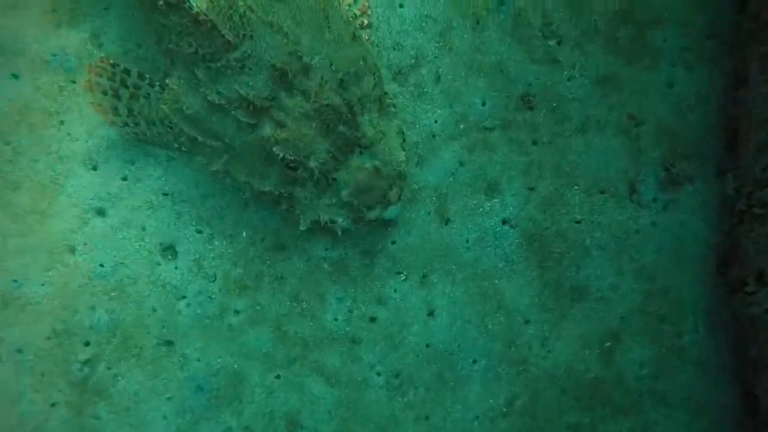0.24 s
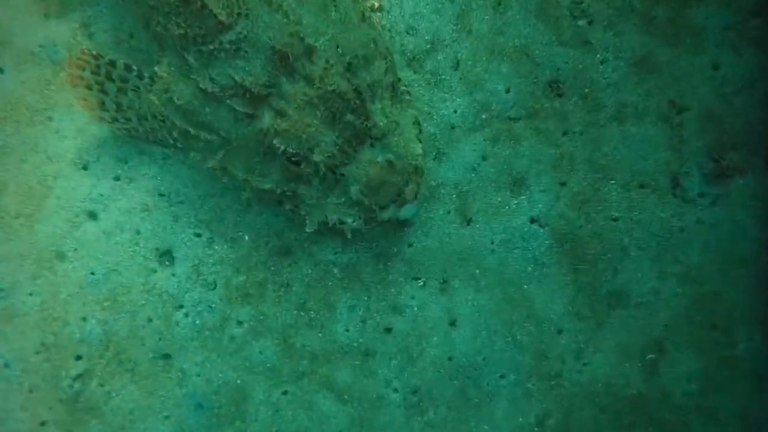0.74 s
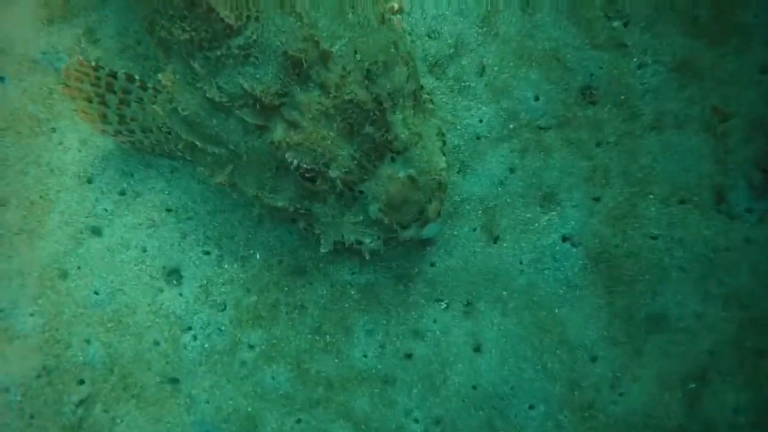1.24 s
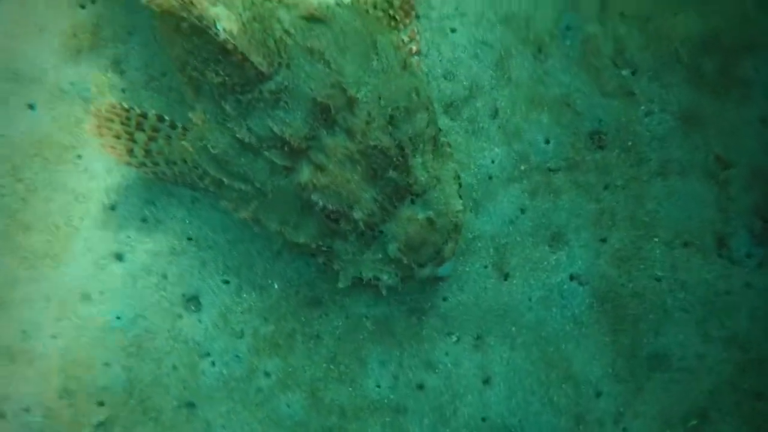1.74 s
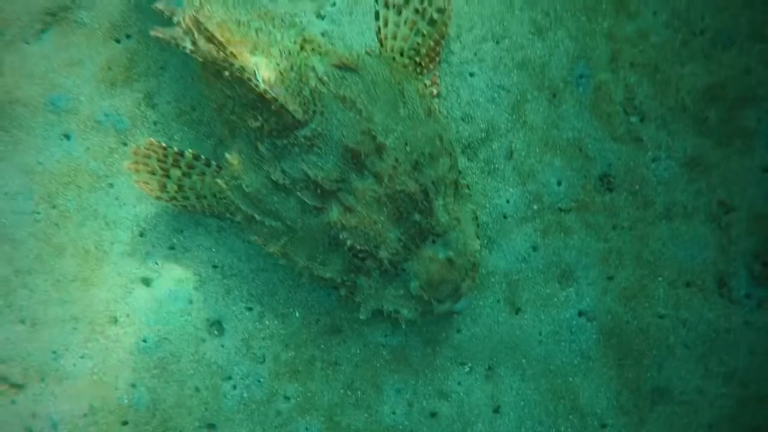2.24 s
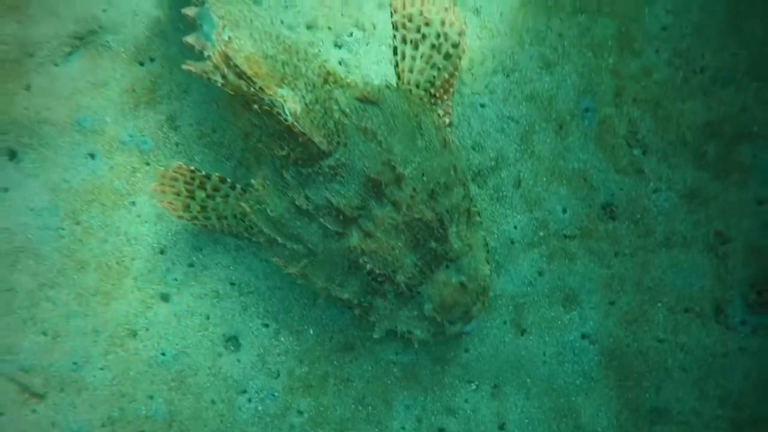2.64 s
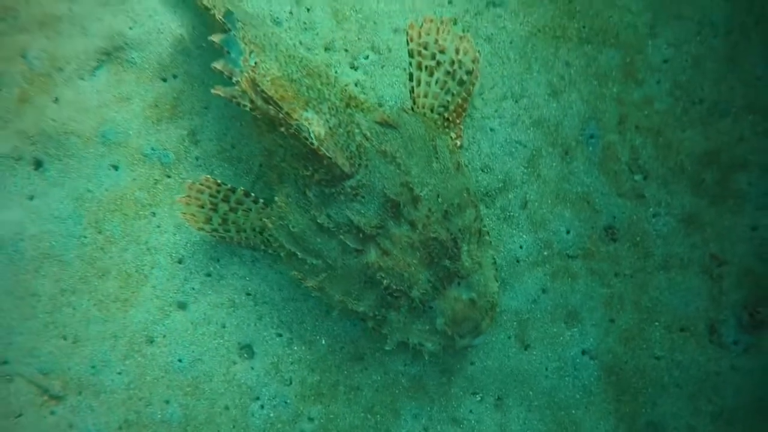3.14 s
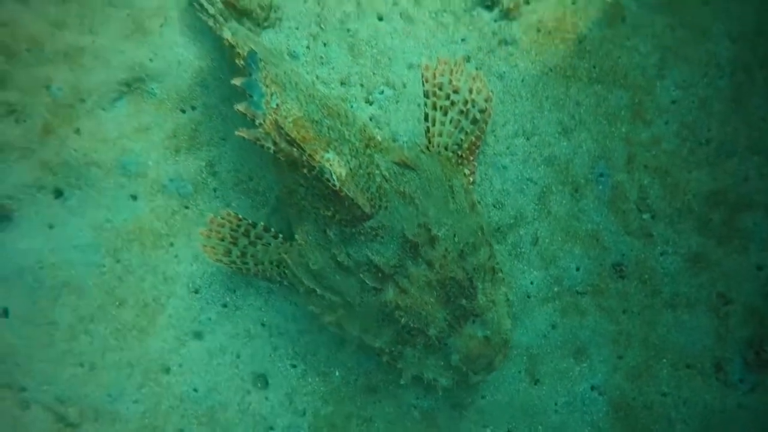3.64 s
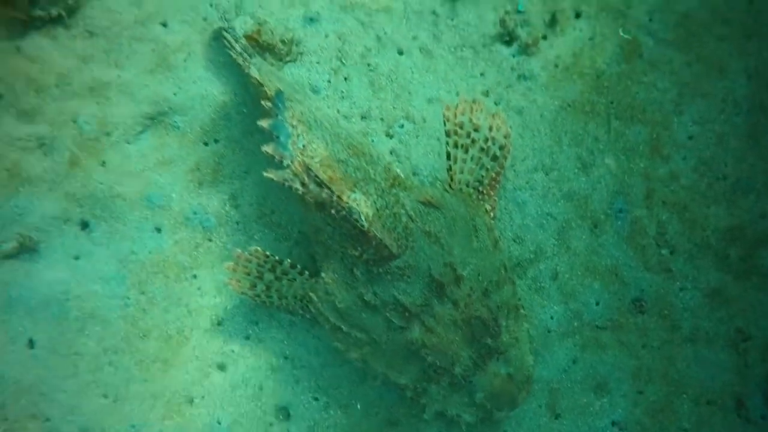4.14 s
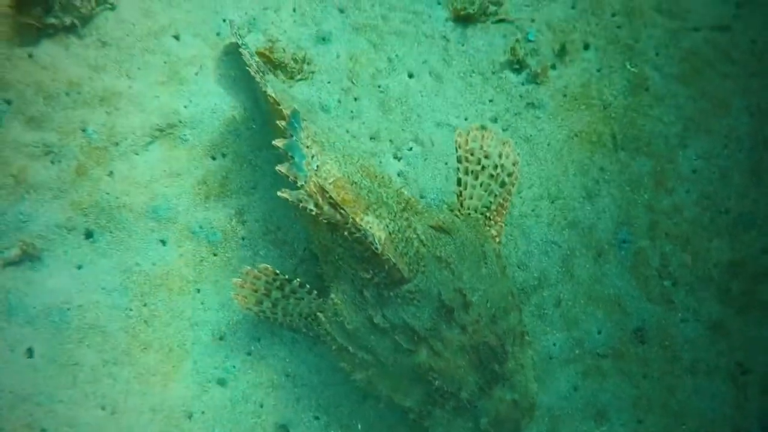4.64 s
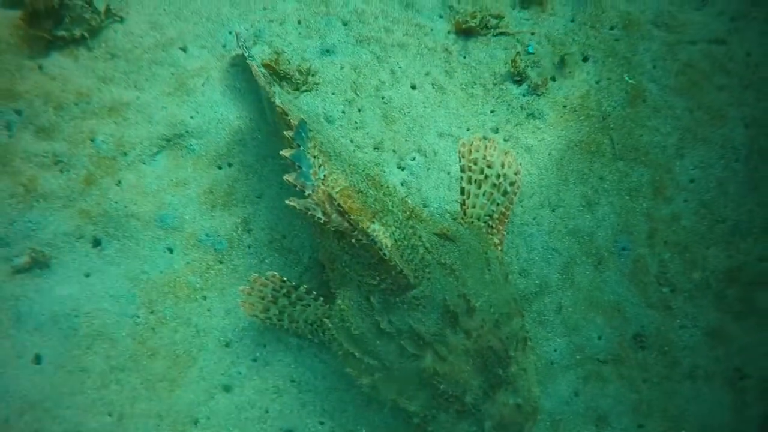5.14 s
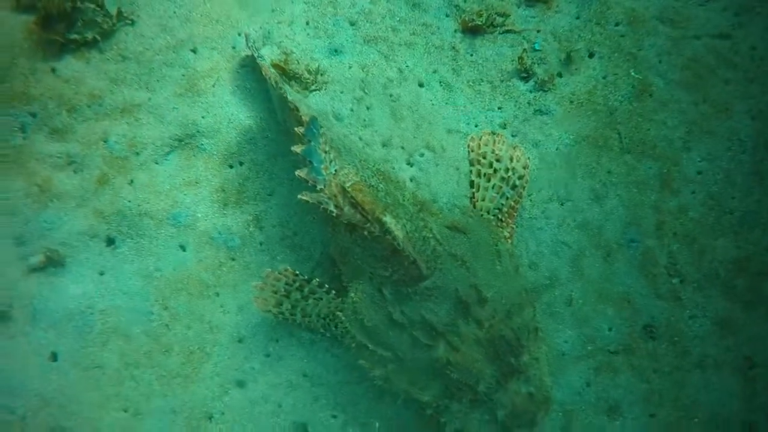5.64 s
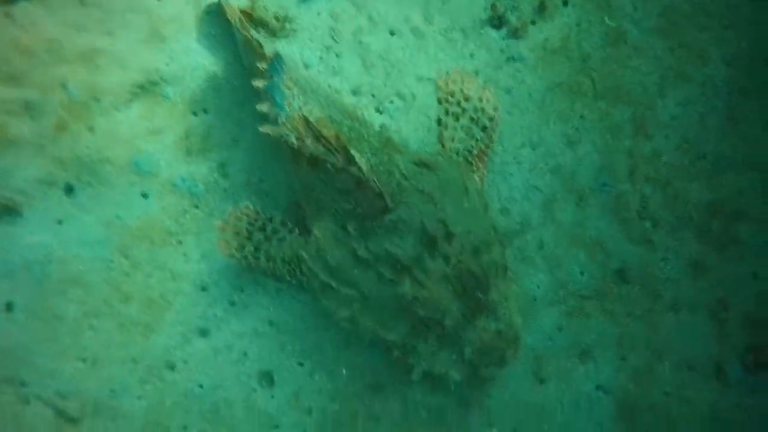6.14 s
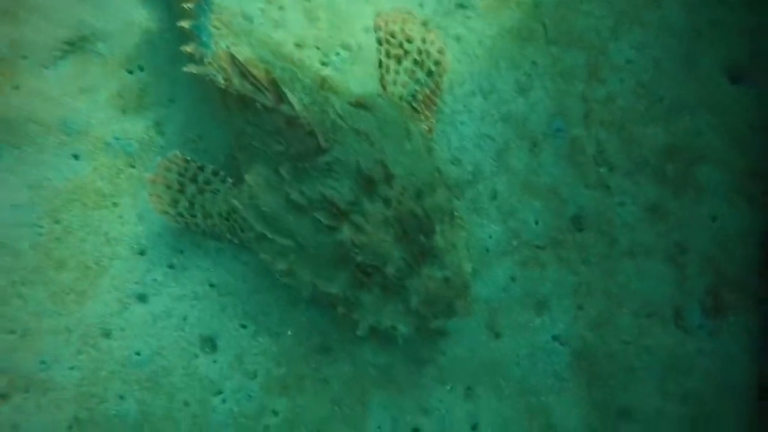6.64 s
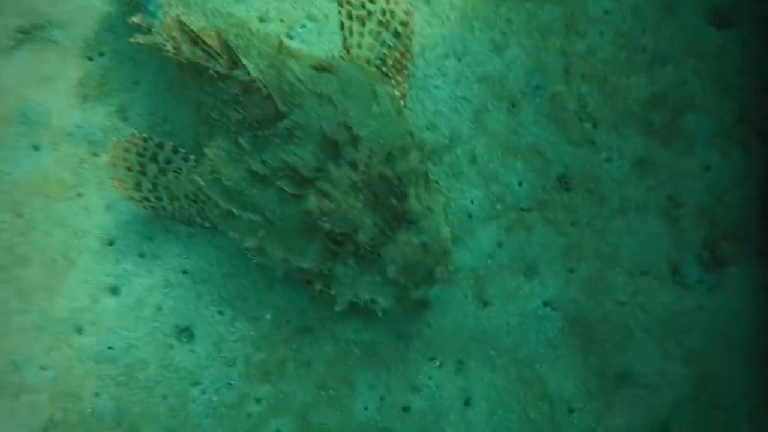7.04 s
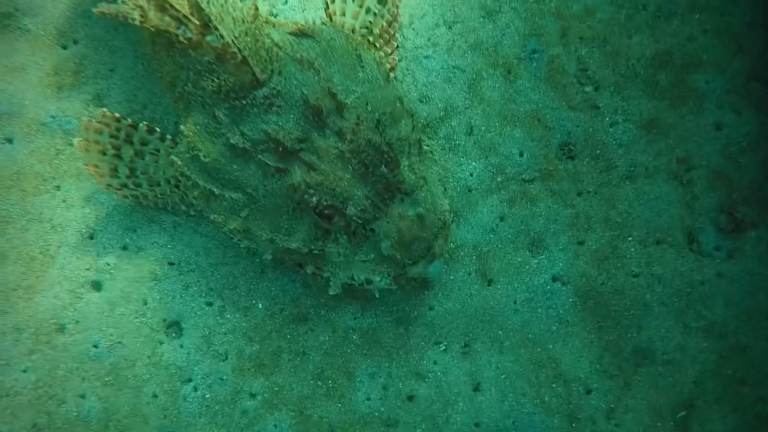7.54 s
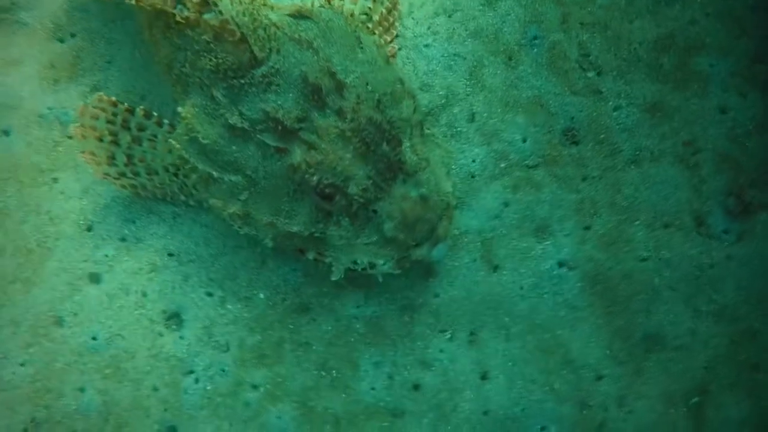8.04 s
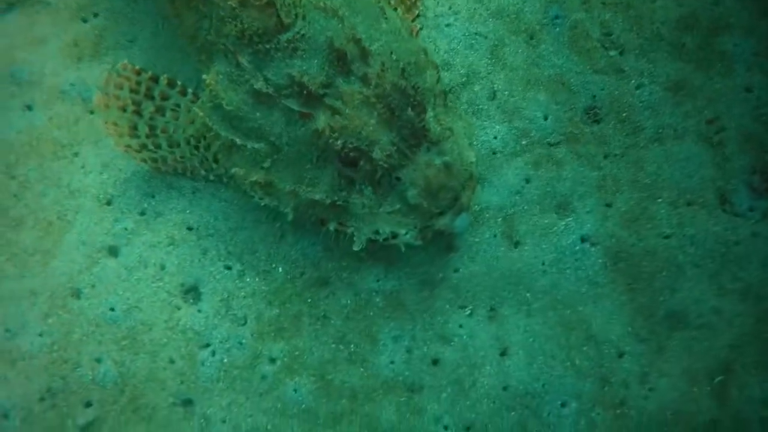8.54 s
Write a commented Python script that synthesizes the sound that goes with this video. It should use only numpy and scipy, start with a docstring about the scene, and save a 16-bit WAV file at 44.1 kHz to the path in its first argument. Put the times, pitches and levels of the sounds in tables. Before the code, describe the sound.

Snapping shrimp crackle densely underwater, sharp hollow clicks near and far over low water rumble and soft knocks on the camera housing.

```python
"""A shallow sandy reef, heard from a camera in a watertight housing that hovers above it.
Snapping shrimp crackle near and far; each near snap comes direct, off the surface and scattered by the seabed,
and rings the resonances of the housing. Now and then a bump knocks its low resonances.
Moving water sways the housing, rumbles along it and makes the air inside drone, over a soft hiss and
a thin whistle."""
import sys
import numpy as np
from scipy import signal
from scipy.fft import rfft, irfft, next_fast_len
from scipy.io import wavfile
from scipy.ndimage import map_coordinates

SR = 44100
rng = np.random.default_rng(int(sys.argv[2]) if len(sys.argv) > 2 else 0)


def int16_out(signal):
    """Quantize to a 16-bit WAV file."""
    q = np.round(np.clip(np.atleast_2d(signal).T, -1, 1) * 32767)
    wavfile.write(sys.argv[1], SR, q.astype(np.int16))


N = 386757
TIME = np.arange(N) / SR
SNAP_TIME = np.arange(4096) / SR
RING_TIME = np.arange(1536) / SR
SIDES = np.array([[.5], [-.5]])  # left, right: each takes half of a difference between them

# resonances of the housing:
# [f/Hz, width/Hz, relative level/dB, left minus right/dB, left lead/rad]
HOUSING = [(340, 71, -4.5, 10.5, -2.5), (516, 240, -21, -3, 1.5), (655, 55, -9.5, 1.5, -2),
           (775, 125, -2.5, 2, 3.5), (962, 108, -0.5, -3, -2.5), (1055, 156, 0.5, 2.5, -3),
           (1181, 99, -4, 0, -1.98), (1470, 190, -1.5, -4.5, 1.46), (1596, 140, 3, -1, 1.3),
           (1720, 195, 1.5, -5, 0.02), (1975, 170, 0.5, -8, -1.2), (2310, 320, -1.5, 2, 4),
           (2640, 200, 0, -7.5, 1.33), (3124, 450, 4, -6, 3.5), (3470, 620, -5.5, 1, -4),
           (3780, 300, -1.5, -16, 2), (4270, 280, -8.5, -5.5, 1), (4830, 600, -10, -6.5, 4),
           (6100, 700, -22, -2, 0.2)]
# tops of its low (body) and middle (upper) registers; the crack lies above
BODY_TOP_HZ, UPPER_TOP_HZ = 1280, 1840
FORERUNNER_S = 0.006  # how early the weak forerunner through the seabed starts


def from_db(db):
    """Decibels to gain."""
    return 10 ** (np.asarray(db) / 20)


def rms_one(x):
    """Scale to rms 1."""
    return x / np.sqrt(np.mean(x ** 2) + 1e-20)


def in_time(rows):
    """The level of a [t/s, level/dB] table at every sample."""
    s, level_db = np.transpose(rows)
    return np.interp(TIME, s, level_db)


def add(out, s, sound):
    """Mix a stereo sound in at time s."""
    i = max(round(s * SR), 0)
    out[:, i:i + sound.shape[1]] += sound[:, :max(N - i, 0)]


def drift(rate):
    """Smooth random wandering through about rate random points a second; rms 1."""
    knots = rng.standard_normal(2048)
    return rms_one(map_coordinates(knots, [TIME * rate], order=2, mode="wrap"))


def noise(spectrum, alike, pan_db, lag_s=0):
    """Stereo noise of a given colour and left-right likeness, later on the left by lag_s; rms 1."""
    hz, db = np.transpose(spectrum)
    size = next_fast_len(N)
    f = np.maximum(np.fft.rfftfreq(size, 1 / SR), 1)
    gain = from_db(np.interp(np.log(f), np.log(hz), db, left=-np.inf, right=-np.inf))
    white = rng.standard_normal((2, size))
    mid, side = irfft(rfft(white) * gain, size)[:, :N]
    alike = np.clip(alike, -1, 1)
    both = np.sqrt(1 + alike) * mid + np.sqrt(1 - alike) * side * [[1], [-1]]
    both[0] = np.interp(TIME - lag_s, TIME, both[0])
    return rms_one(both * from_db(SIDES * pan_db))


def ring(t, hz, width, pan_db, lead, phase):
    """A resonance swells and dies; the two microphones sit at different points of its wave."""
    age = t * np.pi * width / np.sqrt(np.sqrt(2) - 1)
    envelope = age * np.exp(1 - age)
    return envelope * from_db(SIDES * pan_db) * np.sin(2 * np.pi * hz * t + phase + SIDES * lead)


def sustained(hz, width, pan_db, lead):
    """One resonance kept ringing by random pressure; rms 1."""
    mode = ring(SNAP_TIME, hz, width, pan_db, lead, 0)
    pressure = rng.standard_normal((1, N))
    return rms_one(signal.oaconvolve(pressure, mode, axes=1)[:, :N])


def struck_housing(modes, path, vary_db, vary_lead, detune):
    """A pulse train rings the wall modes; random direction sets their strengths and phases. Energy 1."""
    rings, gains = [], []
    for hz, width, db, pan_db, lead in modes:
        strength, lean, turn, shift, phase = rng.standard_normal(5)
        rings.append(ring(RING_TIME, hz + detune * width * shift, width, pan_db + vary_db * lean,
                          lead + vary_lead * turn, 2 * np.pi * phase))
        gains.append(from_db(db + vary_db * strength))
    rung = signal.fftconvolve(np.array(rings), path[None, None], axes=2)
    # even out the modes' energies, so that the gains alone set the balance
    sound = np.tensordot(gains / np.linalg.norm(rung, axis=(1, 2)), rung, 1)
    return sound / np.linalg.norm(sound)


def water_path(delay, reflected_db, smear, echo_share, scatter_t60, far_db, far_t60, pulse_share=0):
    """A direct pulse, all or partly smeared, its surface echo, seabed scatter and a faint longer wash."""
    t = SNAP_TIME
    grains = rng.standard_normal((4, len(t))) * rng.exponential(1, (4, len(t))) ** 1.6
    late = np.maximum(t - delay, 0)
    swell = np.minimum(t / abs(delay), 1)
    shapes = [t * np.exp(-t / smear),
              late * np.exp(-late / smear),
              swell * from_db(-60 * t / scatter_t60),
              swell * from_db(-60 * t / far_t60)]
    smeared, echo, scatter, wash = [g / np.linalg.norm(g) for g in grains * shapes]
    share, clean = np.clip([echo_share, pulse_share], 0, 1)
    direct = np.sqrt(clean) * (t == 0) + np.sqrt(1 - clean) * smeared
    # the surface turns its echo upside down
    reflected = np.sqrt(1 - share) * scatter - np.sqrt(share) * echo
    return direct + from_db(reflected_db) * reflected + from_db(far_db) * wash


def with_forerunner(path, db):
    """Put a soft swell, which has come faster through the sand, ahead of the water-borne pulse."""
    swell = np.linspace(0, 1, max(round(FORERUNNER_S * SR), 2)) ** .5
    early = swell * rng.standard_normal(len(path))[:len(swell)]
    return np.concatenate([from_db(db) * early / np.linalg.norm(early), path])


def hiss():
    """A soft steady hiss: coloured noise, almost unrelated left and right."""
    # colour of the hiss: [f/Hz, relative level/dB]
    hiss_colour = [(300, -13), (700, 7.5), (1500, -8.5), (2200, -5), (3500, -3), (4800, -5.5), (6000, -13),
                   (7200, -25), (9000, -50)]
    return from_db(-61.4) * noise(hiss_colour, alike=0.061, pan_db=-3.0)


def whistle():
    """A thin whistle: one narrow resonance held ringing by random pressure."""
    return from_db(-71.5) * sustained(hz=4298, width=40, pan_db=-2.5, lead=-2.8)


def far_snaps(per_s, spread_db, wash_db, low_db, upper_db, crack_db):
    """Countless distant snaps of uneven size merge into a crackle that keeps the housing ringing."""
    # course of the distant colony, before its trim: [t/s, level/dB]
    colony_course = [(0, -57.5), (1.5, -57.5), (2.9, -58.5), (4.2, -59), (5.7, -59), (6.1, -60),
                     (7.9, -56.5), (8.77, -57)]
    sizes = from_db(spread_db * np.minimum(rng.exponential(1, N), 4))
    clicks = rms_one(sizes * (rng.random(N) < per_s / SR))
    crackle = 0
    for hz, width, db, pan_db, lead in HOUSING:
        drive = rng.standard_normal(N) * (np.abs(clicks) + from_db(wash_db))
        mode = ring(RING_TIME, hz, width, pan_db, lead, 0)
        mode = mode / np.linalg.norm(mode)
        lift = [low_db, upper_db, crack_db][np.digitize(hz, [BODY_TOP_HZ, UPPER_TOP_HZ])]
        crackle = crackle + from_db(db + lift) * signal.oaconvolve(drive[None], mode, axes=1)[:, :N]
    return from_db(in_time(colony_course) + 3.5) * rms_one(crackle)


def flow(lumpy_db, lumps_per_s):
    """Water sways the housing, rumbles along it in eddies and makes the air inside drone."""
    # courses of the sway, of the rumble, and of the flutter and drone, before trims: [t/s, level/dB]
    sway_course = [(0, -27), (.3, -35), (.72, -30.5), (1.18, -33), (1.75, -33), (1.9, -35.5), (2.12, -31.5),
                   (2.42, -35.5), (2.8, -34.5), (3.15, -39), (3.32, -31.5), (3.52, -37), (4.2, -40),
                   (4.92, -38), (5.3, -39), (6.85, -35.5), (7.1, -34), (7.38, -36), (7.7, -32), (8.77, -32)]
    rumble_course = [(0, -44), (.35, -49), (2.0, -50), (2.8, -47.5), (3.8, -48.5), (5.45, -47.5),
                     (6.1, -50), (7.2, -51), (7.65, -46), (8.45, -43), (8.77, -52.5)]
    flutter_course = [(0, -55), (1.5, -53), (2.9, -52.5), (4.1, -53), (5.4, -50), (6.1, -52.5),
                      (7.3, -52.5), (8.25, -48.5), (8.77, -44)]
    # their colours: [f/Hz, relative level/dB]
    sway_colour = [(3, -16.5), (6, -4), (10, 0.5), (17, -1), (22, -4.5), (30, -8), (38, -17.5), (50, -15.5),
                   (90, -59.5)]
    rumble_colour = [(25, -19.5), (42, -3.5), (56, -0.5), (70, -2.5), (95, -4), (130, -11.5), (250, -33)]
    flutter_colour = [(70, -18), (130, 0), (180, 4.5), (215, 3), (260, -3.5), (330, -0.5), (420, -15.5),
                      (520, -25.5), (800, -18), (1200, -33.5), (2500, -46.5)]
    flutter_db = in_time(flutter_course)
    # all five layers swell together with the eddies, each to its own degree
    eddies = lumpy_db * drift(lumps_per_s)
    sway_gain = from_db(in_time(sway_course) + 4.2 + 0.7 * eddies)
    sway = sway_gain * noise(sway_colour, alike=0.995, pan_db=-1.5, lag_s=.0011)
    rumble_gain = from_db(in_time(rumble_course) - 0.6 + eddies)
    rumble = rumble_gain * noise(rumble_colour, alike=0.69, pan_db=-3.0)
    flutter = from_db(flutter_db - 1.2 + 1.05 * eddies) * noise(flutter_colour, alike=0.44, pan_db=5.0)
    air_mode = sustained(hz=327, width=55, pan_db=6, lead=-1.9)
    drone = from_db(flutter_db - 4.3 + 1.2 * eddies) * air_mode
    second_mode = sustained(hz=365.0, width=86, pan_db=-1, lead=-2.57)
    second_drone = from_db(flutter_db - 2.8 + .6 * eddies) * second_mode
    return sway + rumble + flutter + drone + second_drone


def bumps(trim_db):
    """Soft knocks ring the low resonances of the housing, most of all those near the contact's pitch."""
    # bumps on the housing, before the trim:
    # [t/s, level/dB, pitch of the contact f/Hz, damping as a multiple of the modes' width]
    knocks = [(.233, -37, 234, 1), (0.481, -32, 241, .9), (0.487, -36, 120, 1), (0.496, -34, 680, 1),
              (0.727, -37, 270, 1.4), (0.789, -34, 328, 1.2), (0.818, -32, 700, 1.2), (1.169, -29.5, 89, 1),
              (1.887, -35.5, 245, .45), (2.195, -34, 150, 1), (2.336, -35.5, 190, 1.2), (2.358, -39, 95, 1),
              (2.625, -22.5, 130, 2.2), (2.768, -29.5, 135, 1.2), (2.781, -35, 322, .9),
              (2.785, -38, 680, 1.2), (2.844, -33.5, 192, 1.2), (2.953, -28, 85.5, .55),
              (3.282, -37, 90, 1), (3.706, -36, 540, 3.5), (3.908, -36, 200, 1), (4.093, -36.5, 55, 1),
              (4.137, -39, 340, 1.3), (4.32, -39, 90, 1), (4.668, -37, 250, 1), (4.778, -36.5, 440, .6),
              (4.886, -31.5, 380, 2.2), (4.892, -32.5, 130, .7), (4.98, -29.5, 90, 1),
              (5.042, -39, 214, .6), (5.127, -39, 195, 1), (5.4, -37.5, 90, 1), (5.482, -38.5, 335, 1),
              (5.73, -36.5, 195, 1), (5.945, -36.5, 94, .9), (6.248, -37, 220, 1), (6.307, -38, 338, 1),
              (6.67, -37, 335, 1), (6.81, -34, 230, 1), (6.983, -32.5, 271, .7), (7.354, -28.5, 90, 1.2),
              (7.653, -37, 95, 1), (7.846, -19, 385, 1.1), (7.902, -33, 260, 1), (8.415, -29, 194, .5),
              (8.419, -29, 95, .9), (8.422, -26, 330, 1), (8.442, -31, 300, 1), (8.523, -25.5, 94.5, 1.6)]
    # low resonances of the housing: [f/Hz, undamped width/Hz, left minus right/dB, left lead/rad]
    low_modes = [(52, 24, -9, 6.5), (88, 26, 0, 0.5), (130, 77, -4, 1), (192, 56, 2.5, 1.3),
                 (333.4, 33.4, 4, -2), (406.5, 47, -1.5, -2.5), (560, 210, 1.5, 2), (665, 70, 5, -1)]
    focus_db = 30  # loss of a mode one octave from the contact's pitch
    out, mode_hz = np.zeros((2, N)), np.array(low_modes)[:, 0]
    for s, db, pitch_hz, damping in knocks:
        weights = from_db(-focus_db * np.log2(mode_hz / pitch_hz) ** 2)
        weights = weights / np.linalg.norm(weights)
        rings = [ring(SNAP_TIME, hz, width * damping, pan_db, lead, rng.uniform(0, 2 * np.pi))
                 for hz, width, pan_db, lead in low_modes]
        add(out, s, from_db(db + trim_db) * np.tensordot(weights, rings, 1))
    return out


def small_snaps(per_s, size_db, spread_db, count=16):
    """Shrimp at middle distance, in count directions, tick in the upper resonances; most are faint."""
    out = np.zeros((2, N))
    upper_modes = np.array(HOUSING)[5:]
    paths = [water_path(rng.uniform(.003, .012), -5, .0003, .5, .05, -18, .1) for _ in range(count)]
    voices = [struck_housing(upper_modes, path, vary_db=4, vary_lead=.9, detune=.4) for path in paths]
    # 1024 possible moments, of which per_s a second come true on average
    for k, (when, area, chance) in enumerate(rng.random((1024, 3))):
        if chance < per_s * TIME[-1] / 1024:
            tick_db = size_db - spread_db * np.sqrt(area)
            add(out, when * TIME[-1], from_db(tick_db) * voices[k % count])
    return out


def snap(modes, body_db, upper_db, crack_db, reflected_db, echo_s, smear_s, smear_per_db, crisp_db,
         closest_db, dry_per_db, scatter_t60, wash_db, wash_t60, treble_loss):
    """One shrimp rings three registers of the housing; levels are as rms over 40 ms."""
    register = np.digitize(modes[:, 0], [BODY_TOP_HZ, UPPER_TOP_HZ])
    span = np.sqrt(2 * .04 * SR)  # energy 1 to rms 1 over 40 ms of two channels
    # a dull snap has come a longer way: its arrival is more spread out, its forerunner stronger
    dullness = np.clip(max(body_db, upper_db - 6) - crack_db, -10, 15)
    smear = smear_s * from_db(smear_per_db * dullness)
    early_db = -28 + dullness
    # within the crack, thin snaps lean to the top (dB per octave)
    neutral_db = -5  # crack over upper body
    tilt = .3 * np.clip(crack_db - upper_db - neutral_db, -5, 10)
    modes = modes.copy()
    modes[:, 2] += (register == 2) * tilt * np.log2(np.minimum(modes[:, 0], 4000) / UPPER_TOP_HZ)
    # the loudest shrimp are the closest: their surface echo comes later and stands out from the scatter
    distance_db = np.clip(closest_db - max(body_db, upper_db, crack_db), 0, 20)
    spread_db = rng.standard_normal()  # from shrimp to shrimp
    delay = 0.0089 * from_db(spread_db - .3 * distance_db)
    wet_db = dry_per_db * distance_db
    echo_share = 1 - 0.32 * from_db(wet_db)
    pulse_share = 0
    if echo_s is not None:
        # a clean snap: half the direct energy in one sharp pulse, a distinct echo, no forerunner
        delay, smear, echo_share, pulse_share = echo_s, .0007, .62, .5
        early_db = -np.inf
    sound = 0
    for k, db in enumerate([body_db, upper_db, crack_db]):
        # the higher registers arrive more crisply and their scatter dies sooner
        fading = 1 + treble_loss * k
        path = water_path(delay, reflected_db, smear * from_db(crisp_db * k), echo_share,
                          scatter_t60 / fading, wet_db + wash_db, wash_t60 / fading, pulse_share)
        rung = struck_housing(modes[register == k], with_forerunner(path, early_db),
                              vary_db=1.1, vary_lead=0.45, detune=0.14)
        sound = sound + from_db(db) * span * rung
    return sound


def near_snaps(body_trim_db, upper_trim_db, crack_trim_db, pan_spread_db):
    """Single shrimp close by, each from its own direction, ring the housing through the water."""
    # near snaps, before the trims:
    # [t/s, body level/dB, upper body level/dB, crack level/dB, reflected over direct energy/dB];
    # those that arrive as one clean pulse with a distinct surface echo go on with
    # [echo delay/s, left minus right/dB]
    shrimp = [(0.072, -66, -60, -60, -2), (0.192, -53, -53.5, -58.5, -2), (0.218, -64, -57, -64, -8),
              (0.337, -48, -44.5, -55, 3), (0.405, -70, -60, -55, -8), (0.492, -39.5, -55, -59, -7),
              (0.558, -45, -42.5, -58, 1), (0.578, -64, -57, -58, -8), (0.654, -63, -65, -59, 3),
              (0.684, -53, -55, -65, 6), (0.736, -70, -68, -63, -10), (0.789, -48, -52, -62, 8),
              (0.815, -35, -45, -53.5, -8), (0.849, -59, -56, -52.5, -20), (0.927, -54, -49, -47.5, -8),
              (0.981, -68, -63, -59, -12), (1.138, -72, -70, -66, -12), (1.178, -64, -53, -61.5, -4),
              (1.207, -56, -50, -56.5, -8), (1.251, -66, -57, -58, -12), (1.265, -55, -50, -54, 4),
              (1.274, -59, -57, -54, 0), (1.3305, -70, -67, -55.5, -18, .009, 0),
              (1.507, -68, -60, -65, -10), (1.561, -72, -68, -66, -12), (1.6, -53, -64, -70, -6),
              (1.646, -60, -59, -63, -3), (1.687, -57, -52, -53, -10, .013, 0), (1.807, -68, -64, -61, -10),
              (1.837, -56, -50, -66, -4), (1.8915, -47.5, -41.5, -48, -5, .018, 0),
              (2.04, -68, -64, -62, -8), (2.069, -68, -64, -62, -8), (2.111, -61, -49.5, -64, 3),
              (2.144, -48.5, -46, -55, 2), (2.233, -70, -66, -63, -10), (2.251, -58, -52, -57, 3),
              (2.269, -66, -61, -57.5, -2), (2.288, -64, -58, -59, -4), (2.404, -50.5, -50, -58, 5),
              (2.415, -64, -60, -56, -12), (2.5373, -68, -52, -50.5, -15, .012, 0),
              (2.5892, -41.5, -39, -44, -2, .0105, 0), (2.625, -48, -59, -62, -20),
              (2.71, -66, -70, -61, -15), (2.78, -42, -49.5, -60, -5), (2.843, -48.5, -62, -70, -9),
              (2.861, -54, -51, -71, -8), (2.917, -68, -62, -60, -6),
              (2.9375, -33.5, -29, -40.5, 3, .007, 0), (3.057, -39.5, -36, -52.5, -1),
              (3.072, -56, -54, -53.5, 0), (3.133, -44.5, -52, -60, -2), (3.277, -72, -68, -65, -12),
              (3.332, -63, -72, -61, -4), (3.384, -60, -61, -59.5, -4), (3.411, -67, -60, -63, -16),
              (3.4875, -61, -54, -51.5, -7, .004, 0), (3.532, -41, -52, -66, -6),
              (3.606, -72, -70, -67, -10), (3.623, -62, -55, -64, -6), (3.706, -55, -55, -64, -15, .009, 0),
              (3.817, -72, -70, -67, -10), (3.848, -70, -64, -64, -10), (3.888, -59.5, -51.5, -68, -2),
              (3.938, -72, -68, -64, -12), (3.974, -48, -58, -68, -3.5), (4.03, -55, -47, -63, 0),
              (4.053, -65, -62, -55.5, -18), (4.09, -56.5, -51.5, -59, 2), (4.138, -45.5, -41, -64, -5),
              (4.153, -56, -47.5, -45.5, -20, .009, 0), (4.231, -55, -54, -52.5, 0),
              (4.283, -56, -47, -60, -1), (4.295, -68, -62, -60, -8), (4.453, -72, -68, -64, -12),
              (4.502, -64, -56, -58, -8), (4.562, -49, -57, -63, -9), (4.607, -57.5, -54, -52.5, 2.5),
              (4.642, -49.5, -42.5, -53.5, -9), (4.672, -53, -56, -68, -4), (4.684, -60, -54, -65, -4),
              (4.782, -49, -62, -70, -7), (4.79, -64, -61, -58, -8),
              (4.888, -43.5, -44.5, -58, 6, .0115, 0), (5.001, -64, -57, -66, -6),
              (5.042, -51, -60, -68, -4), (5.119, -49.5, -54, -59.5, 10), (5.235, -44, -44.5, -62, -2.5),
              (5.269, -66, -62, -60, -8), (5.505, -48, -43.5, -63.5, 0),
              (5.5557, -40.5, -32.5, -44.5, -8, .013, 0), (5.689, -72, -68, -66, -10),
              (5.714, -46, -40, -52, 3, .0055, 0), (5.756, -52, -52, -52.5, 10),
              (5.778, -43, -36, -47.5, 0, .008, 0), (5.893, -49, -50, -65, -13),
              (5.933, -54, -47, -54, 1, .004, 0), (6.029, -66, -60, -55.5, -17, .009, 0),
              (6.234, -66, -62, -61, -6), (6.307, -46.5, -41.5, -60.5, 6), (6.325, -54, -45.5, -70, -1),
              (6.555, -62, -54, -66, -6), (6.589, -72, -57, -58.5, -21), (6.765, -47.5, -41.5, -52, -5),
              (6.936, -56, -48, -66, 8), (6.995, -55, -53, -59, -5.5), (7.056, -52.5, -53.5, -80, -5.5),
              (7.233, -69, -57, -55.5, -19, .009, 0), (7.281, -72, -68, -64, -12),
              (7.344, -72, -68, -63, -12), (7.453, -72, -68, -65, -10), (7.464, -50, -48, -70, 3),
              (7.546, -62, -55, -72, -3), (7.645, -48.5, -49, -66, -8),
              (7.6945, -30, -26, -47.5, -11, .015, 3), (7.762, -52, -51, -73, 5),
              (7.807, -60, -55, -70, -4), (7.847, -34.5, -42.5, -59, -1), (7.903, -50, -52, -62, -2),
              (7.911, -47.5, -48, -56.5, 1), (7.939, -51.5, -43.5, -55, 4), (8.024, -44.5, -45, -68, 4),
              (8.127, -62, -59, -64.5, 1), (8.189, -70, -66, -64, -8), (8.24, -68, -62, -66, -6),
              (8.305, -56, -44, -58, -7), (8.422, -46, -51, -58, 0), (8.438, -43.5, -50, -65, 1.5),
              (8.468, -63, -53, -56, -10), (8.528, -72, -59, -58, 1), (8.587, -52, -56, -68, 12),
              (8.646, -63, -61, -53, -3)]
    out, modes = np.zeros((2, N)), np.array(HOUSING)
    for s, body, upper, crack, reflected_db, *clean in shrimp:
        echo_s, pan_db = clean or (None, pan_spread_db * rng.standard_normal())
        sound = snap(modes, body + body_trim_db, upper + upper_trim_db, crack + crack_trim_db,
                     reflected_db, echo_s, smear_s=0.00074, smear_per_db=0.75, crisp_db=-0.5,
                     closest_db=-24, dry_per_db=.5, scatter_t60=0.17, wash_db=-18.5, wash_t60=.2,
                     treble_loss=0.13)
        add(out, s - FORERUNNER_S, from_db(SIDES * pan_db) * sound)
    return out


def scene():
    """Hiss and whistle, the distant crackle, flow and bumps, then the shrimp closer by."""
    background = hiss() + whistle()
    far = far_snaps(per_s=180, spread_db=1.5, wash_db=2.0, low_db=2.0, upper_db=-9, crack_db=-15.5)
    water = flow(lumpy_db=3.1, lumps_per_s=20)
    knocks = bumps(trim_db=2.5)
    ticks = small_snaps(per_s=24, size_db=-23, spread_db=10)
    near = near_snaps(body_trim_db=3.0, upper_trim_db=-3.5, crack_trim_db=4.0, pan_spread_db=1.5)
    return background + far + water + knocks + ticks + near


def record(dry):
    """A steep low-pass keeps only the lower treble; short fades open and close without a click."""
    cutoff_hz, fade_s = 7400, .004
    fade = np.minimum(np.minimum(TIME, TIME[::-1]) / fade_s, 1)
    return signal.sosfilt(signal.ellip(10, .2, 70, cutoff_hz, fs=SR, output="sos"), dry * fade)


dry = scene()
out = record(dry)
int16_out(out)
```